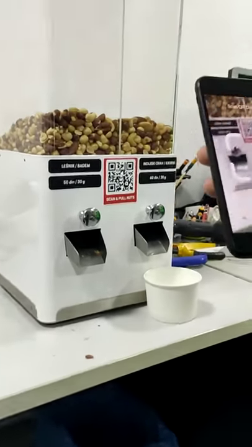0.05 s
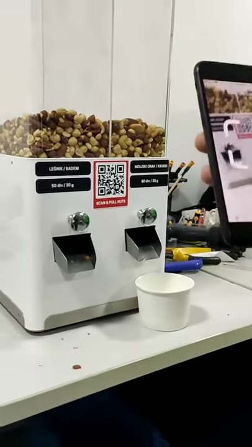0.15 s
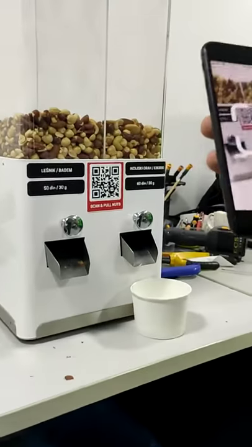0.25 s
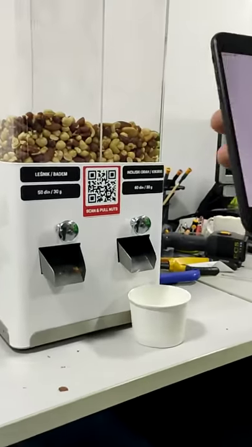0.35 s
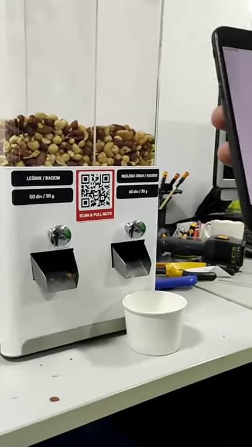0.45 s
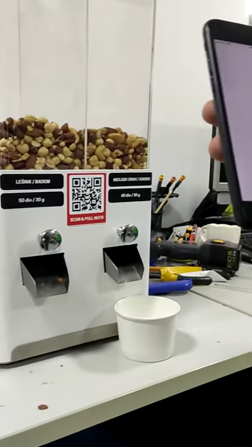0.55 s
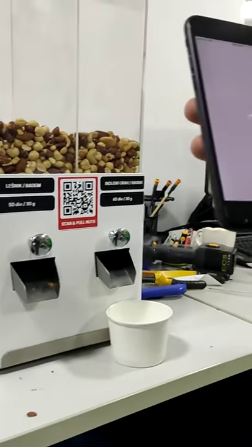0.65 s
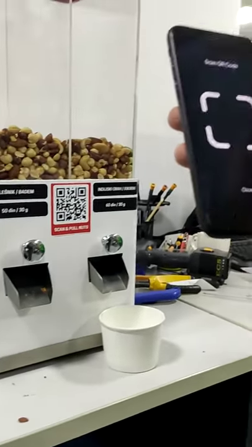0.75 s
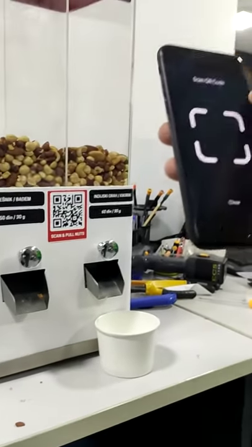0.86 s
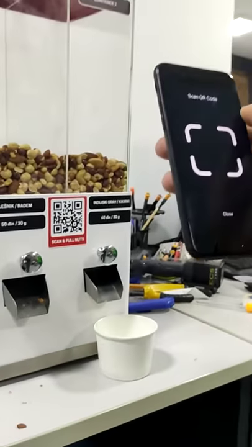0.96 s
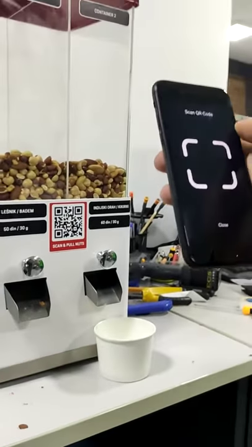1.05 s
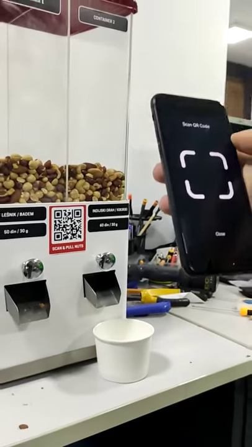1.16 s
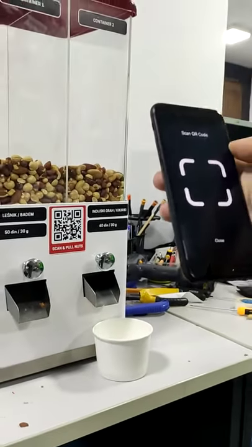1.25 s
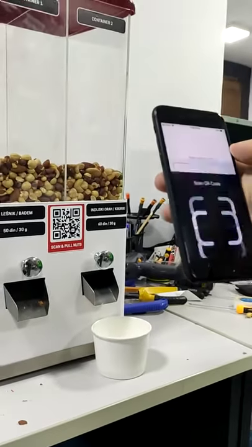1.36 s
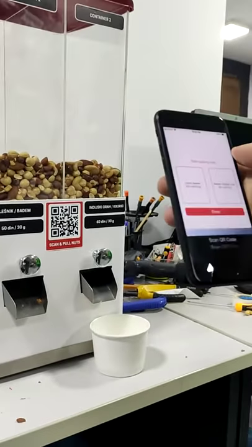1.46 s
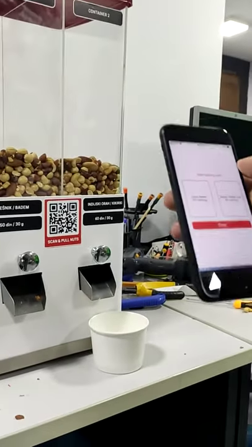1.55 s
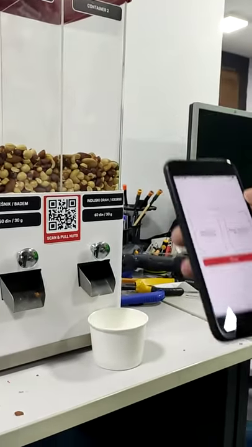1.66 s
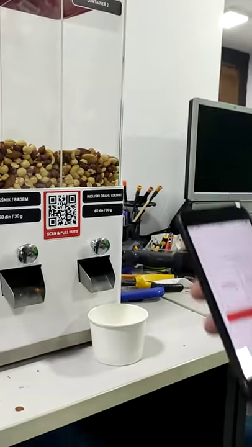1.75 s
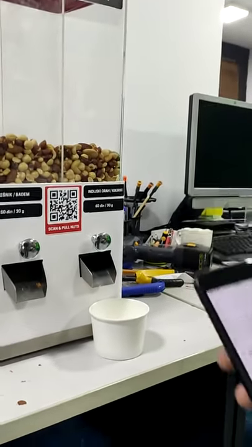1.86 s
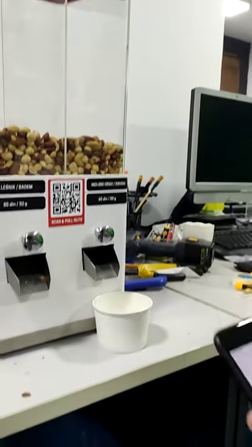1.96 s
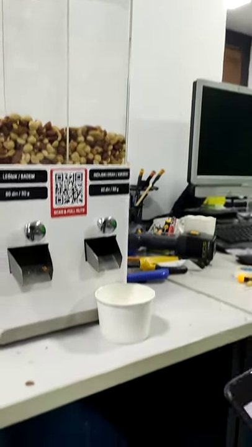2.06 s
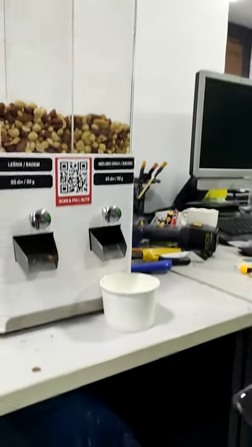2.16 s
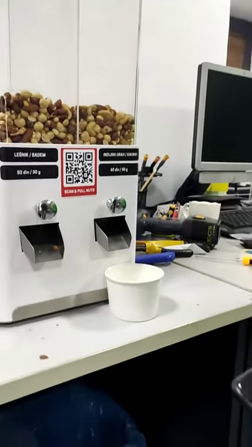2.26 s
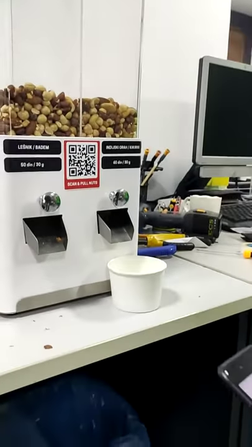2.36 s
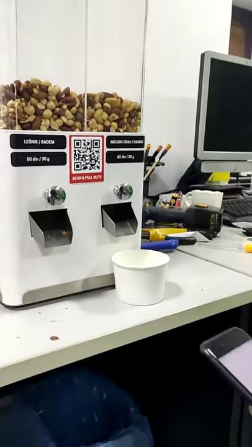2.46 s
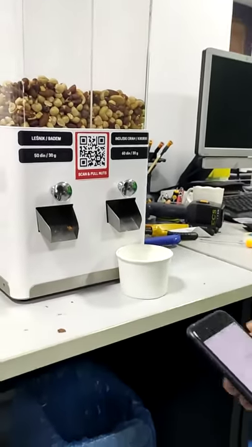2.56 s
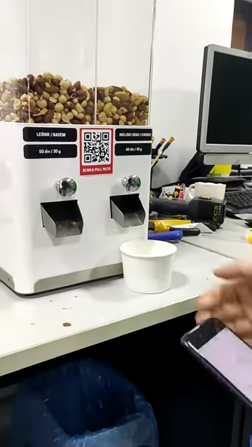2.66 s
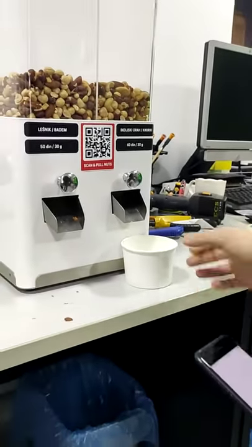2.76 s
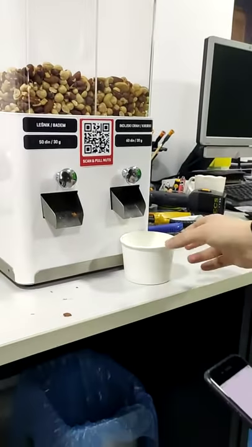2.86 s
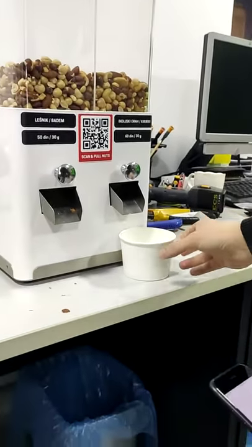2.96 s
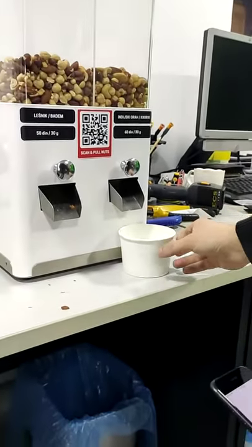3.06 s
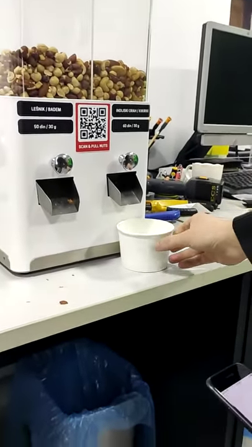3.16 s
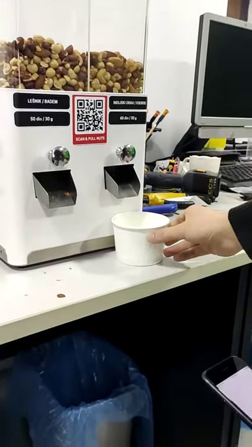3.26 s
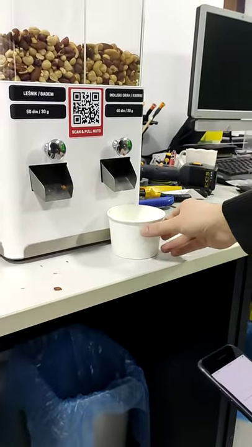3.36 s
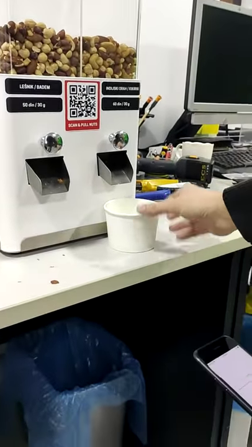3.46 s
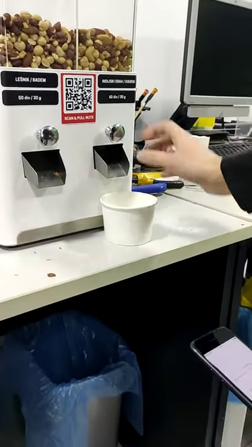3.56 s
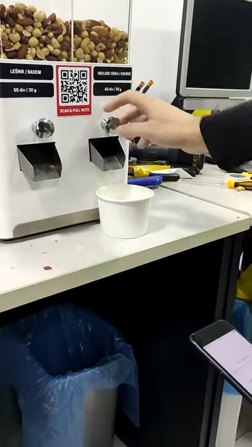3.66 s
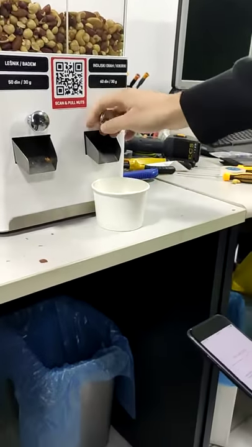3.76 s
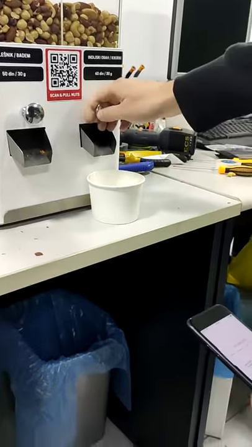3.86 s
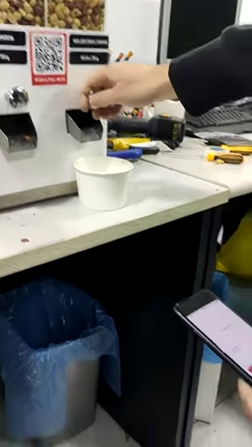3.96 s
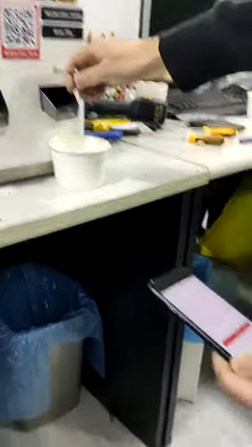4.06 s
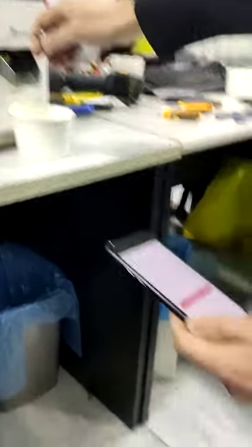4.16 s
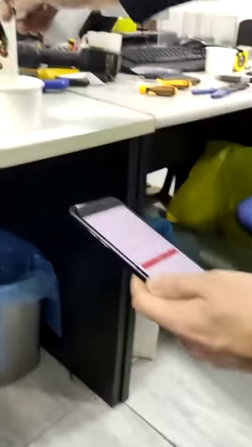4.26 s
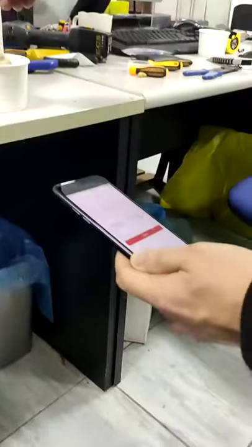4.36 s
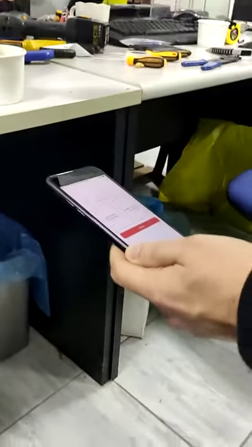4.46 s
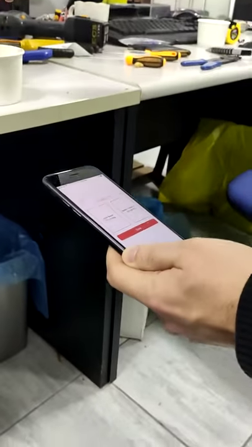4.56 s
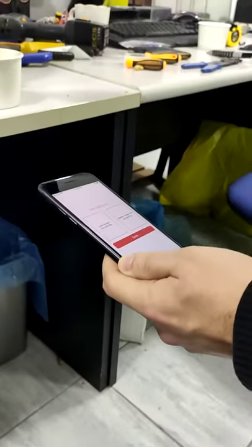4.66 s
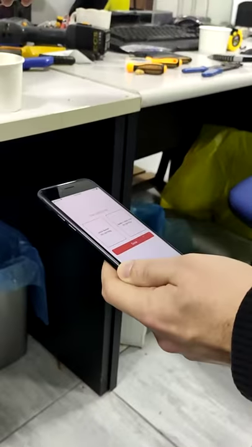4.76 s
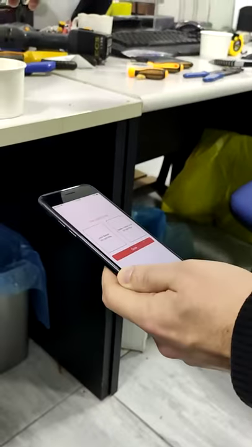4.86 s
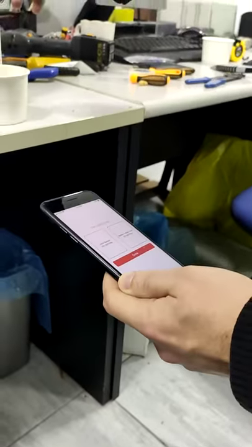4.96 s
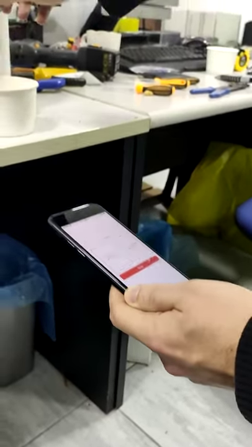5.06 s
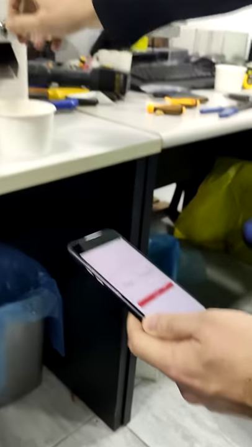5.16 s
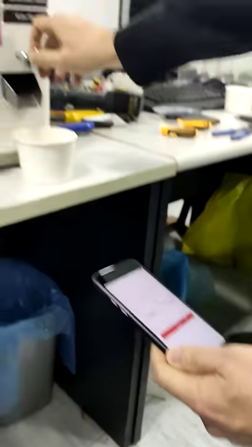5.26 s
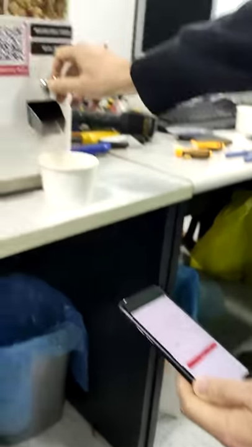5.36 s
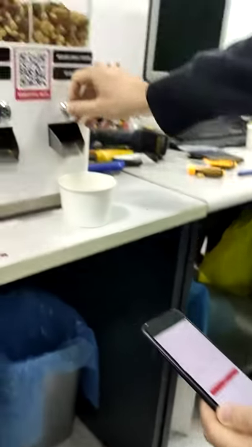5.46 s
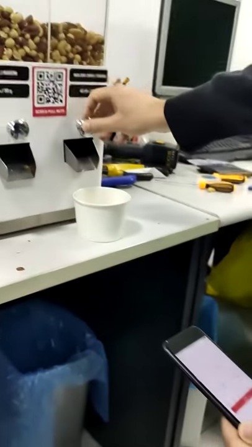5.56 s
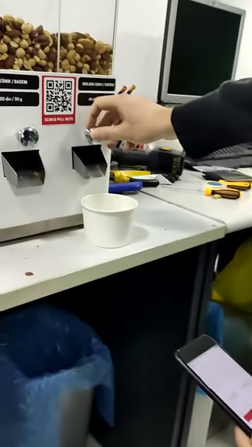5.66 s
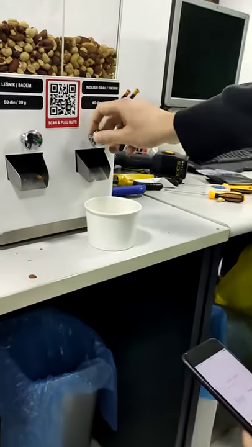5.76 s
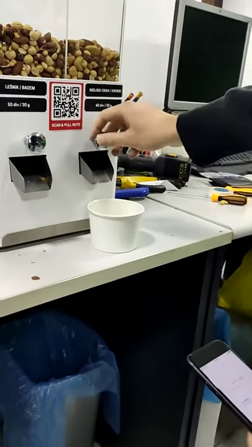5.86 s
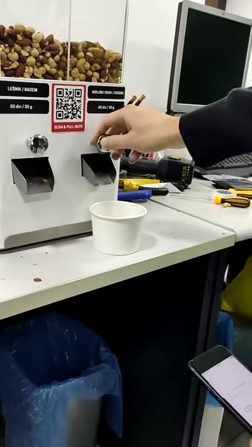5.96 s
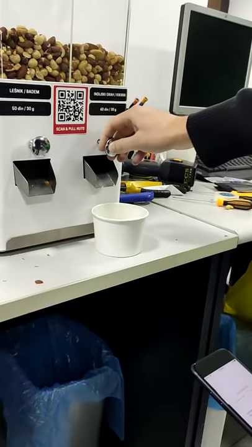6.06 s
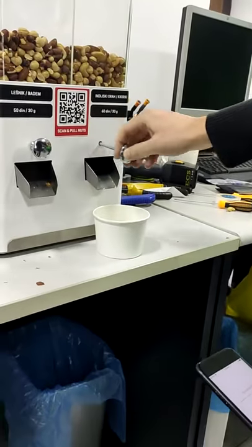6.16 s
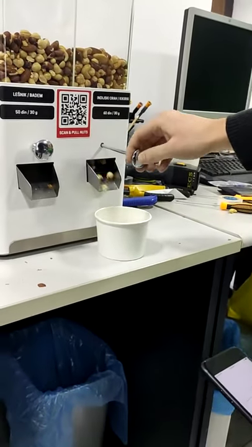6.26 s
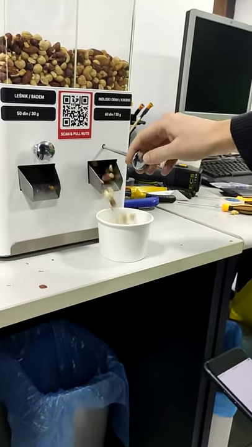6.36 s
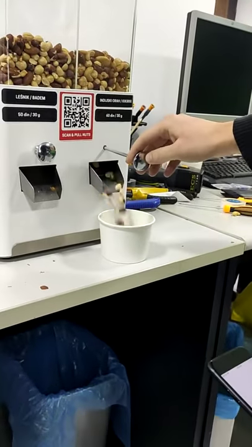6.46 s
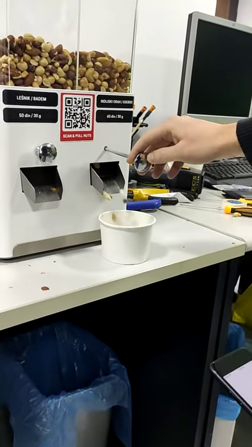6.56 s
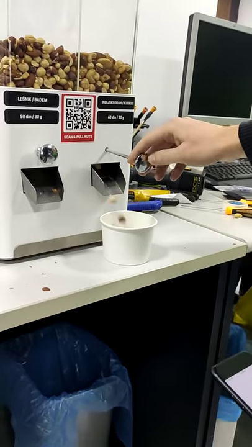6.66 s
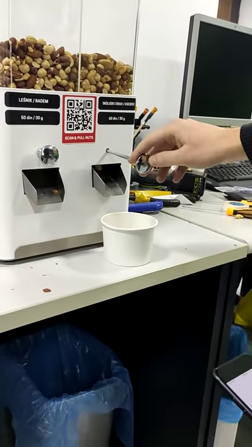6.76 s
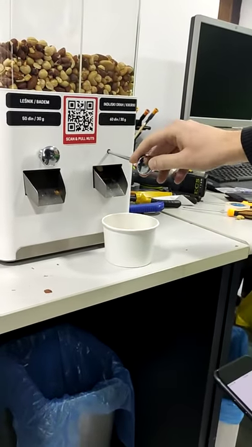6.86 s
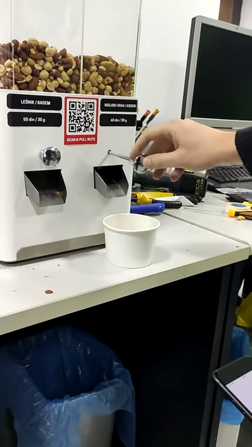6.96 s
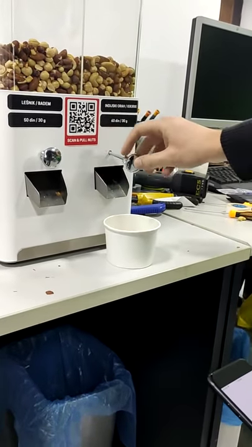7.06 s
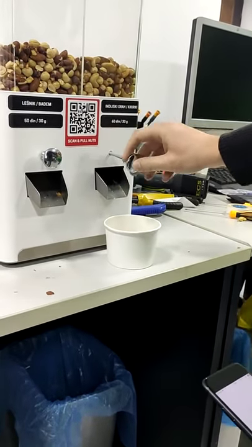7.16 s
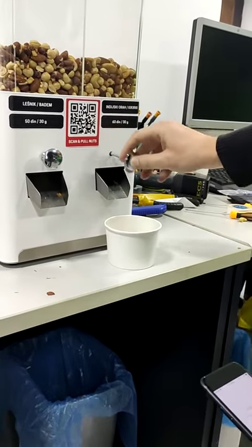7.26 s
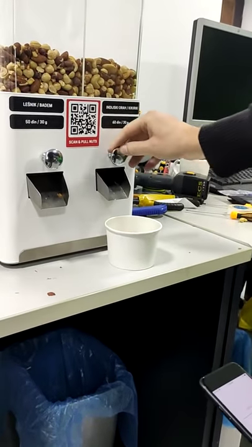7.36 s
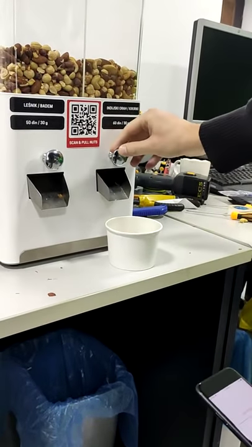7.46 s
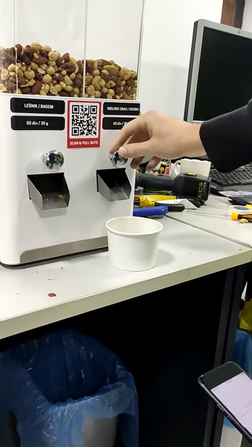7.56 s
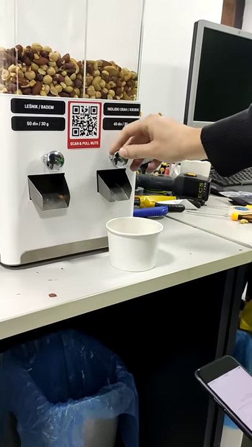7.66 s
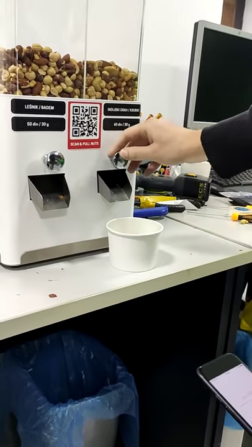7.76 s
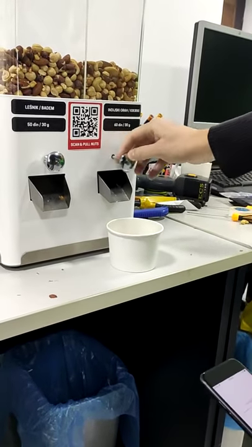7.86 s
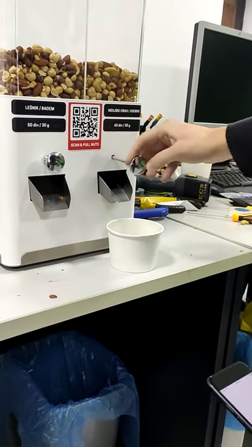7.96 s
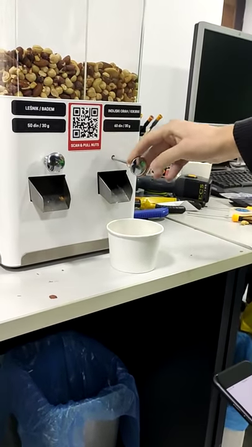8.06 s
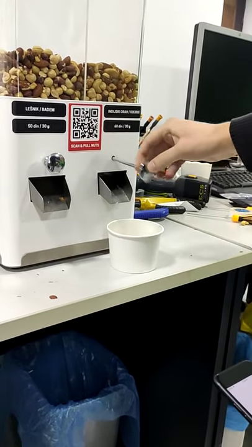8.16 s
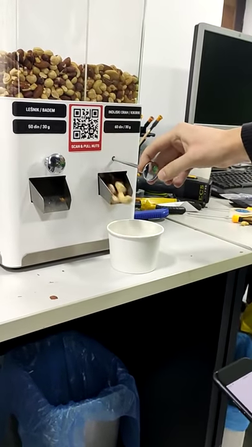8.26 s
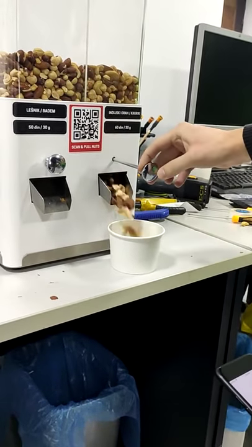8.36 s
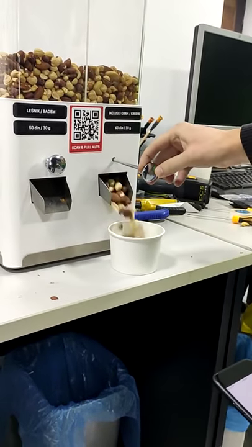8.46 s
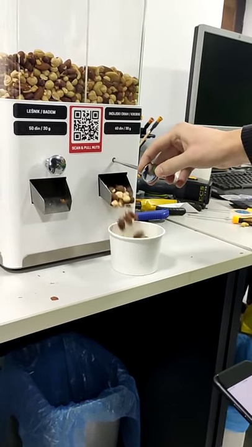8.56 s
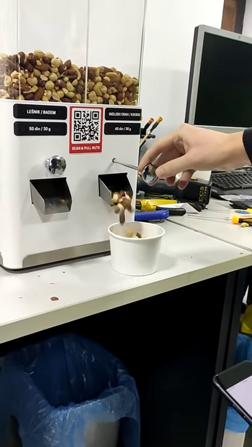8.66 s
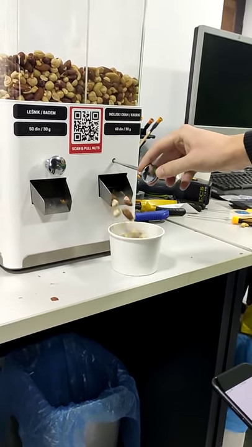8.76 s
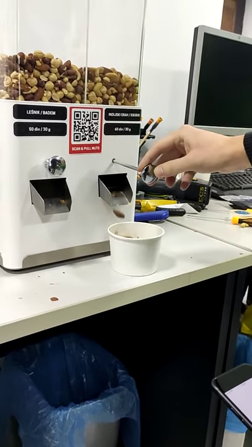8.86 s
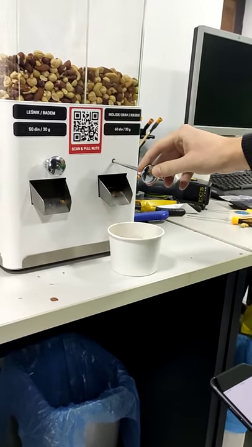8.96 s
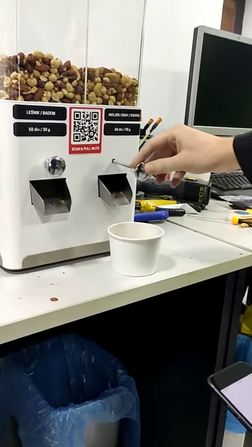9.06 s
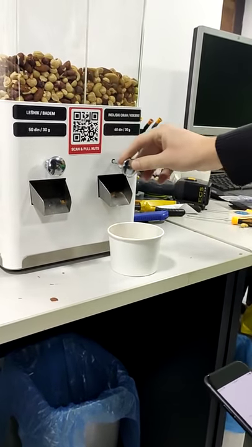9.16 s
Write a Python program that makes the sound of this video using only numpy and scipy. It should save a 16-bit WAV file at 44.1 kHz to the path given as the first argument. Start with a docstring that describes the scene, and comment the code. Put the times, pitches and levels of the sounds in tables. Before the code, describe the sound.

Light desk taps and rustles, then sharp metallic pulls and knocks, each pull spilling a short patter of nuts into a paper cup.

```python
"""Nut dispenser on a desk

A hand pulls the slide out and pushes it back, three times; things are moved on the desk beforehand.
Knocks, nut landings and desk taps are damped sines with noise bursts; the slide's rub, the nuts' rattle
in chute and paper cup and the shuffling are many random grains. Most noise is filtered by ringing modes.
The ventilation is banded noise with narrow fan tones; the room adds a decaying stereo noise tail."""
import sys
import numpy as np
from scipy import signal
from scipy.fft import rfft, irfft
from scipy.io import wavfile
from scipy.ndimage import uniform_filter1d, map_coordinates

SR = 44100
rng = np.random.default_rng(int(sys.argv[2]) if len(sys.argv) > 2 else 0)


def pcm_store(signal):
    """Save signal as 16-bit PCM."""
    levels = np.round(np.clip(np.atleast_2d(signal), -1, 1) * 32767)
    wavfile.write(sys.argv[1], SR, levels.astype(np.int16).T)


N = 405719

# Click and note levels in the three impact tables are relative to the row's level_db.
# knocks of slide and knob: start_s, level_db, click_db, note_hz, note_db,
# which of two housing thuds sounds: higher (out) or lower (home)
SLIDE_KNOCKS = [(4.156, -35.5, 8, 1850, -21, "out"), (4.25, -22, 2.5, 1490, -10, "out"),
                (4.337, -31.5, -2.5, 1850, 3, "home"), (5.053, -38, 6, 1840, -8, "out"),
                (5.069, -35.5, 7.5, 1820, -19, "out"), (5.116, -35.5, 15, 2000, -7, "home"),
                (5.419, -18, 4.5, 980, -10.5, "home"), (5.514, -38.5, 6, 2570, -7, "home"),
                (5.604, -37, 15, 2216, 1.5, "out"), (6.105, -41, 3.5, 1030, -10, "out"),
                (6.159, -30, 0, 1010, 0.5, "home"), (6.218, -28, 7, 1880, -20, "home"),
                (6.259, -14, 9, 1490, -13, "out"), (7.038, -37.5, 12.5, 716, 4, "out"),
                (7.055, -41, 16, 977, -19, "out"), (7.295, -21, 13.5, 1960, -3.5, "home"),
                (7.385, -15.5, 4.5, 2370, -29, "home"), (7.516, -41.5, 18.5, 2190, -1, "out"),
                (7.943, -28.5, 5, 1500, -2, "out"), (8.146, -56.5, 16.5, 875, -11, "out"),
                (8.207, -4.5, 9.5, 1490, -11, "out"), (9.11, -41, 7, 1130, -17, "out"),
                (9.167, -31, 4.5, 1595, -2, "home")]
# things set down on the desk: start_s, level_db, click_db, note_hz, note_db
DESK_TAPS = [(0.202, -42, 13, 2830, 6), (0.351, -31.5, 9, 1785, -1.5), (1.195, -20.5, 8, 845, 0.5),
             (2.032, -47.5, -6, 2700, 6), (2.046, -44.5, -3, 1790, 1.5), (2.149, -38.5, 2.5, 1770, 0),
             (2.329, -37.5, 7.5, 1840, -4), (2.597, -50, -17, 2840, 5.5), (2.667, -44, -11, 2770, 3),
             (2.71, -45, -7, 2920, 3.5), (3.274, -53.5, -10, 1250, 13.5), (3.35, -49, -12, 1150, 10)]
# single nuts landing: start_s, level_db, click_db, note_hz, note_db
NUT_LANDINGS = [(4.402, -23, -8, 1290, 1), (4.434, -16, 6, 1270, -10), (4.458, -15, 1, 1870, -14),
                (4.521, -34, 12, 1490, -22), (4.576, -21.5, 4.5, 1380, -16), (4.616, -22, 9.5, 1156, -5),
                (4.671, -22.5, 10, 1580, -3), (4.699, -31, 15, 1310, 0), (4.796, -34, 11, 1760, -8),
                (4.811, -30, 12.5, 1440, 4), (4.863, -19, 7, 1160, -11), (6.35, -34, 7, 2330, 8),
                (6.384, -30.5, -8, 1195, 3.5), (6.432, -25, 10.5, 1194, 0.5), (6.445, -37, 4, 1520, -2),
                (6.472, -34, 15, 1510, 0), (6.503, -28, 5, 1440, 0), (6.532, -25.5, 6, 1540, 2),
                (6.545, -29, 8, 1440, -2), (6.572, -33.5, 11, 1540, 7), (6.666, -38, 14, 1490, 3),
                (6.734, -36.5, 7.5, 1520, 3), (6.768, -34, 5, 1498, 5.5), (6.776, -36, 13, 1486, 0),
                (8.352, -22.5, -11.5, 2310, 4), (8.385, -20.5, 5, 1490, -6), (8.401, -26.5, 13.5, 1450, 0),
                (8.443, -27.5, -4, 1490, 1), (8.499, -22.5, 3, 1424, -9), (8.525, -31.5, 7, 1510, -1),
                (8.558, -34, 4, 1460, -1), (8.711, -30, 9.5, 1490, -2), (8.771, -28, -20, 1510, -10),
                (8.845, -39.5, 16.5, 1510, -5), (8.865, -33, 12, 1510, 3), (8.923, -38.5, 13, 1540, 6)]
# portions of nuts and a late trickle: thickest_s, rise_s, fall_s, rattle_db, treble_db
NUT_POURS = [(4.55, 0.183, 0.49, -32, -31), (6.376, 0.026, 0.46, -35.5, -35),
             (8.36, 0.027, 0.39, -32.5, -30), (8.78, 0.026, 0.58, -44.5, -43)]
# slide rubbing in its guide: fastest_s, rise_s, fall_s, rub_db, treble_db
SLIDE_STROKES = [(4.07, 0.15, 0.54, -40.5, -33), (5.41, 0.27, .006, -42, -34),
                 (6.17, 0.14, 0.091, -37, -31), (7.03, 0.11, 0.0089, -41, -35.5),
                 (7.29, 0.035, 0.0067, -32.5, -25), (7.915, .045, 0.11, -35, -25.5),
                 (8.19, 0.015, 0.042, -23.5, -11)]
# shuffling on the desk: loudest_s, rise_s, fall_s, rustle_db, treble_db
DESK_SHUFFLES = [(0.005, 0.0082, 0.27, -44.5, -42), (0.426, .015, 0.11, -49, -56),
                 (0.58, 0.1, .1, -50, -58), (1.8, 0.27, 0.16, -58, -56), (2.018, 0.012, .03, -49.5, -47.5),
                 (2.48, 0.12, 0.28, -49, -53.5), (3.37, 0.18, 0.08, -66, -60.5)]
# the slide's spring singing: loudest_s, rise_s, fall_s, level_db
SPRING_SQUEAK = [(4.16, .01, 0.27, -57.5)]

# ringing modes of the sheet-metal housing: pitch_hz, width_hz, gain_db
HOUSING_MODES = [(710, 21, 8.5), (980, 97, 1), (1073, 160, 1.5), (1490, 340, -8), (1960, 29, 0.5),
                 (2260, 120, -3), (5400, 65, 11), (6270, 750, 7), (7200, 190, -2.5)]
# ringing modes of chute and cup: pitch_hz, width_hz, gain_db
CUP_MODES = [(450, 45, -13), (1290, 1100, -27.5), (1510, 39, -4.5), (1950, 200, 0), (2360, 37, 4),
             (2905, 360, 7.5), (3550, 180, 6), (6670, 830, -7.5)]
# ringing modes of the desk: pitch_hz, width_hz, gain_db
DESK_MODES = [(215, 59, 9.5), (550, 49, -17), (940, 31, -13), (3040, 1300, -22), (6970, 1200, 7)]
# the two thuds of the housing: name -> pitch_hz, level_db (relative to the knock)
HOUSING_THUD = {"out": (262, -13), "home": (197, -19)}
# thud of the cup: pitch_hz, level_db (relative to the landing)
CUP_THUD = (455, -19.5)

# broad colour of the knocks: frequency_hz, gain_db
KNOCK_COLOUR = [(24, -52), (40, -5), (254, -2.5), (342, -5), (633, -9), (894, -6), (1200, -12),
                (1500, -6.5), (3300, -10.5), (6750, -16.5), (14500, -18)]
# broad colour of the desk taps: frequency_hz, gain_db
TAP_COLOUR = [(35, -78), (60, -8), (403, -2), (517, -3.5), (663, -4.5), (870, -4.5), (1090, -4), (2760, -2),
              (3880, -11), (7000, -7.5), (8200, -19.5), (13500, -23.5)]
# broad colour of the nuts: frequency_hz, gain_db
NUT_COLOUR = [(35, -51), (60, -25.5), (344, -8), (442, -3.5), (639, -3), (1530, -0.5), (2110, -6.5),
              (2910, -5.5), (4290, -9.5), (6340, -13.5), (14500, -33.5)]
# broad colour of the rubbing: frequency_hz, gain_db
RUB_COLOUR = [(59, -50), (100, -12), (212, -0.5), (587, -8.5), (1700, -8.5), (1850, -2), (2180, -2),
              (6570, -32.5), (14500, -34)]
# broad colour of the shuffling: frequency_hz, gain_db
RUSTLE_COLOUR = [(300, -13.5), (1200, -8.5), (2800, 2), (3600, -2), (4500, -11.5), (6500, -7.5),
                 (9000, -22), (14000, -30)]
# broad colour of the ventilation air: frequency_hz, gain_db
AIR_COLOUR = [(12, -52), (20, -39), (64, -20), (86, -20.5), (123, -27), (167, -34), (214, -11), (246, -6.5),
              (414, -4.5), (577, -10), (739, -5.5), (1360, -21.5), (1740, -13), (3190, -29), (14500, -36)]
# random level flicker of the air: frequency_hz, standard_deviation_db
AIR_FLICKER = [(30, 12), (150, 0.5), (600, 2), (3000, -1)]
# left-right correlation of the air: frequency_hz, correlation (-1 to 1)
AIR_LIKENESS = [(60, 0.65), (130, 0.99), (290, 0.51), (630, 0.37), (1390, -0.34), (3050, 0.29),
                (6690, -0.03), (14700, -0.05)]
# fan tones: pitch_hz, width_hz, rms_db
FAN_TONES = [(122.2, 36, -81.5), (213.4, 15.5, -72), (365, 22, -96.5), (411, 12, -81.5), (721.7, 39, -72)]

# reverberation time of the room: frequency_hz, t60_s
ROOM_T60 = [(100, 0.84), (260, 0.36), (700, 0.38), (1840, 0.27), (4850, 0.3), (12800, 0.18)]
# left-right correlation of the room tail: frequency_hz, correlation (-1 to 1)
ROOM_LIKENESS = [(100, 0.99), (300, 0.93), (800, 0.095), (2000, 0.061), (10000, 0.18)]
# sensitivity of the left port over the right: frequency_hz, gain_db
LEFT_PORT = [(100, 1.5), (300, 1), (700, -1), (1500, 6.5), (3000, 4.5), (8000, 2)]


def dispenser():
    """Impact and friction excite one resonator: the slide knocks and rubs in its sheet-metal housing."""
    impacts = np.transpose([row[:5] for row in SLIDE_KNOCKS])
    thuds = [HOUSING_THUD[row[5]] for row in SLIDE_KNOCKS]
    tones, knocks = blows(*impacts, thuds, rise_s=0.0016, thud_s=0.015, ring_s=0.0076, click_s=0.0035,
                          note_s=0.0055, ring_db=7.5, grit_db=2.0, snap_db=9.5)
    rub = grains(SLIDE_STROKES, rise_db=17, fall_db=8.5, per_s=2300, spread_db=3.0, grain_s=0.0023)
    ringing = body(knocks, KNOCK_COLOUR, HOUSING_MODES) + body(rub, RUB_COLOUR, HOUSING_MODES)
    return tones + squeak() + ringing


def squeak():
    """Friction noise selects one narrow resonance of the spring."""
    tone = rng.standard_normal(N)
    for _ in range(2):      # two passes steepen the skirts
        tone = resonance(tone, hz=1840, width_hz=49)
    return rms_one(tone) * swells(SPRING_SQUEAK, rise_db=9, fall_db=5.0)


def nuts():
    """Granular impact: single landings and a dense rattle set chute and cup ringing."""
    thuds = [CUP_THUD] * len(NUT_LANDINGS)
    tones, hits = blows(*np.transpose(NUT_LANDINGS), thuds, rise_s=0.0024, thud_s=0.0046, ring_s=0.0042,
                        click_s=0.0023, note_s=0.0038, ring_db=1.5, grit_db=6.0, snap_db=8.5)
    rattle = grains(NUT_POURS, rise_db=4, fall_db=14.5, per_s=600, spread_db=4.5, grain_s=0.0013)
    pitched = amp(6.5) * clacks(rattle, low_hz=930, high_hz=2650, sharpness=8.2, count=7)
    return tones + body(hits + rattle + pitched, NUT_COLOUR, CUP_MODES)


def clacks(x, low_hz, high_hz, sharpness, count):
    """Random pitch: every 256 samples the rattle is dealt to one of several resonances."""
    dealt = rng.integers(0, count, N // 256 + 1).repeat(256)[:N]
    pitches = np.geomspace(low_hz, high_hz, count)
    return sum(resonance(x * (dealt == k), hz, hz / sharpness) for k, hz in enumerate(pitches))


def desk():
    """Impact on a plate and sliding contact: taps ring the desk, shuffled things rustle."""
    heaviest = max(row[1] for row in DESK_TAPS)
    # the heaviest tap thuds at -13 dB; each dB of a lighter tap costs its thud a further 0.89 dB
    thuds = [(501, -13 - 0.89 * (heaviest - row[1])) for row in DESK_TAPS]
    tones, taps = blows(*np.transpose(DESK_TAPS), thuds, rise_s=0.0024, thud_s=0.011, ring_s=0.0052,
                        click_s=0.0016, note_s=0.0025, ring_db=5.5, grit_db=3.5, snap_db=2.5)
    rustle = grains(DESK_SHUFFLES, rise_db=11, fall_db=13.5, per_s=600, spread_db=6.0, grain_s=0.003)
    return tones + body(taps, TAP_COLOUR, DESK_MODES) + coloured(rustle, RUSTLE_COLOUR)


def ventilation():
    """Broadband flow noise with lumpy lows; narrow-band noise makes the wavering fan tones."""
    knots, samples = np.linspace(0, N, 70), np.arange(N)

    def lumpy(hz):
        """Random modulation: the level of one band wanders between knots."""
        flicker_db = at_hz(AIR_FLICKER, hz) * rng.standard_normal(len(knots))
        return np.interp(samples, knots, amp(at_hz(AIR_COLOUR, hz) + flicker_db))

    total = amp(-62.5) * rms_one(stereo_bands(N, AIR_LIKENESS, lumpy))
    white = rng.standard_normal(N)
    for hz, width_hz, db in FAN_TONES:
        tone = resonance(resonance(white, hz, width_hz), hz, width_hz)
        total = total + amp(db) * rms_one(tone)
    return total


def room(x):
    """Diffuse reverberation: a quarter-second noise tail builds up at once and dies band by band."""
    t = np.arange(SR // 4) / SR
    tail = stereo_bands(len(t), ROOM_LIKENESS, lambda hz: amp(-60 * t / at_hz(ROOM_T60, hz)))
    tail = tail * (1 - np.exp(-t / 0.00033)) * np.exp(-(t / 0.35) ** 4)
    tail = tail / np.sqrt(np.sum(tail ** 2) / 2)
    wet = signal.oaconvolve(x[None], tail, axes=1)[:, :N]
    # a random delay, 0.12 ms deep with 70 knots per second, wavers the pitch and blurs spectral lines
    knots = np.arange(0, N + SR, SR / 70)
    waver = np.interp(np.arange(N), knots, rng.standard_normal(len(knots))) * 0.00012 * SR
    channels = np.arange(2)[:, None] + np.zeros(N)
    moments = np.arange(N) + waver + np.zeros((2, 1))
    return map_coordinates(wet, [channels, moments], order=1, mode="nearest")


def placed(x, pan_db, left_lag_s):
    """Stereo level and time difference: direct sound reaches the left port a little later."""
    late = np.interp(np.arange(N) - left_lag_s * SR, np.arange(N), x)
    return np.array([late * amp(pan_db / 2), x * amp(-pan_db / 2)])


def blows(s, level, click, note_hz, note, thuds, rise_s, thud_s, ring_s, click_s, note_s,
          ring_db, grit_db, snap_db):
    """Impact: a damped thump and a short note, returned apart from two chattering noise bursts."""
    at, t = (s * SR).astype(int), np.arange(SR // 6) / SR
    tones, noise = np.zeros(N + len(t)), np.zeros(N)
    for k, i in enumerate(at):
        thud_hz, thud_db = thuds[k]
        thump = amp(thud_db) * np.exp(-t / thud_s) * np.sin(2 * np.pi * thud_hz * t)
        ping = amp(note[k]) * np.exp(-t / note_s) * np.sin(2 * np.pi * note_hz[k] * t)
        tones[i:i + len(t)] += amp(level[k]) * (thump + ping) * (1 - np.exp(-t / rise_s))
    ring = (302, 3880, level + ring_db, ring_s)
    clicking = (3130, 22000, level + click, click_s)
    for low_hz, high_hz, burst_db, decay_s in (ring, clicking):
        envelope = np.zeros(N)
        envelope[at] = amp(burst_db)
        for time_s in (decay_s, min(rise_s, decay_s)):      # the contact builds up, then dies
            r = np.exp(-1 / (time_s * SR))
            envelope = signal.lfilter([1], [1, -r], envelope + 1e-18)
        rebounds = amp(grit_db * np.minimum(rng.exponential(1, N // 32 + 1), 3)).repeat(32)[:N]
        grit = rms_one(rng.standard_normal(N) * rebounds)
        burst = (1 - r) * envelope * grit
        burst[at + round(rise_s * SR)] += amp(burst_db + snap_db)      # one dry snap
        noise += band(burst, low_hz, high_hz)
    return band(tones[:N], 53, 9000), noise


def grains(table, rise_db, fall_db, per_s, spread_db, grain_s):
    """Shot noise: random small contacts, whose body and treble swell and sink with each row."""
    sizes = (rng.random(N) < per_s / SR) * amp(spread_db * np.minimum(rng.exponential(1, N), 3))
    envelope = signal.lfilter([1], [1, -np.exp(-1 / (grain_s * SR))], sizes + 1e-18)
    contacts = rms_one(envelope * rng.standard_normal(N))
    low_rows = [(*row[:3], row[-2]) for row in table]
    high_rows = [(*row[:3], row[-1]) for row in table]
    low = uniform_filter1d(swells(low_rows, rise_db, fall_db), size=300)
    high = uniform_filter1d(swells(high_rows, rise_db, fall_db), size=300)
    return band(contacts * low, 30, 2520) + band(contacts * high, 3550, 14000)


def swells(table, rise_db, fall_db):
    """Exponential growth and decay: each row climbs rise_db to its top, then sinks by fall_db."""
    t = np.arange(N) / SR
    total = np.zeros(N)
    for top, rise, fall, db in table:
        times, levels = [top - rise, top, top + fall], [db - rise_db, db, db - fall_db]
        total += amp(np.interp(t, times, levels, left=-200, right=-200))      # inaudible outside
    return total


def body(x, colour, modes):
    """Modal filtering: ringing modes stand out of a broad colour."""
    click = np.eye(1, 4096)[0]
    response = click + sum(amp(db) * resonance(click, hz, width_hz) for hz, width_hz, db in modes)
    return signal.oaconvolve(x, coloured(response, colour))[:N]


def resonance(x, hz, width_hz):
    """Damped oscillator: a two-pole resonance, gain 1 on top."""
    r = np.exp(-np.pi * width_hz / SR)
    zeros = np.array([1, 0, -1]) * (1 - r * r) / 2
    poles = [1, -2 * r * np.cos(2 * np.pi * hz / SR), r * r]
    return signal.lfilter(zeros, poles, x + 1e-18)


def coloured(x, points):
    """Minimum phase: a causal filter derived from a dB curve by folding its cepstrum."""
    cepstrum = irfft(at_hz(points, np.linspace(0, SR / 2, 4097)) * np.log(10) / 20)
    cepstrum[1:4096] *= 2
    cepstrum[4097:] = 0
    response = irfft(np.exp(rfft(cepstrum)))[:4096]
    return signal.oaconvolve(x, response)[:len(x)]


def stereo_bands(length, likeness, gain):
    """Partial coherence: half-octave noise bands mix mid and side; gain(hz) is each band's envelope."""
    mids, sides, edges = 0, 0, 22 * 2 ** np.arange(0, 10, .5)
    white = rng.standard_normal((2, 2, length))
    for k, (low, high) in enumerate(zip(edges, edges[1:])):
        hz = np.sqrt(low * high)
        mid, side = gain(hz) * band(white[k % 2], low, high)      # neighbours use different noise
        alike = at_hz(likeness, hz)
        mids = mids + np.sqrt(1 + alike) * mid
        sides = sides + np.sqrt(1 - alike) * side
    return np.array([mids + sides, mids - sides])


def band(x, low_hz, high_hz):
    """Band limitation: a Butterworth band-pass."""
    return signal.sosfilt(signal.butter(2, [low_hz, high_hz], "band", fs=SR, output="sos"), x)


def at_hz(points, hz):
    """Logarithmic pitch scale: a spectrum table read on a log-frequency axis."""
    points = np.array(points)
    return np.interp(np.log(np.maximum(hz, 1)), np.log(points[:, 0]), points[:, 1])


def amp(db):
    """Decibel law: the amplitude gain of a dB value."""
    return 10 ** (np.asarray(db) / 20)


def rms_one(x):
    """Mean power: a signal scaled to unit rms."""
    return x / np.sqrt(np.mean(x ** 2) + 1e-20)


def scene():
    """Superposition: each source direct and through its own path in the room, air under all."""
    machine, food, things = dispenser(), nuts(), desk()
    direct = placed(machine, pan_db=1.0, left_lag_s=0.00013)
    direct = direct + placed(food, pan_db=0.78, left_lag_s=0.00015)
    direct = direct + placed(things, pan_db=0.96, left_lag_s=0.000205)
    wet = amp(-1.5) * room(machine) + amp(-3.0) * room(food) + amp(0.5) * room(things)
    return direct + wet + ventilation()


def record(dry):
    """Transducer response: the left port has its own colour, peaks are rounded, the top is cut."""
    ports = np.array([coloured(dry[0], LEFT_PORT), dry[1]]) * amp(-0.5)
    rounded = 0.95 * np.tanh(ports / 0.95)
    low_pass = signal.cheby2(12, 60, 15100, fs=SR, output="sos")      # 60 dB down from 15.1 kHz
    return signal.sosfilt(low_pass, rounded)


dry = scene()
out = record(dry)
pcm_store(out)
```